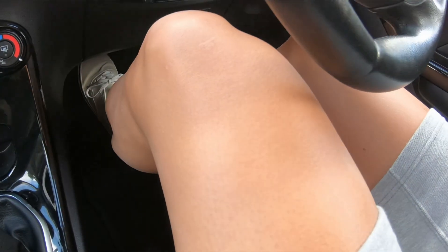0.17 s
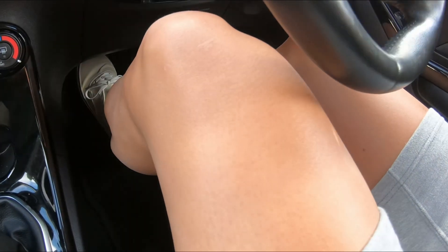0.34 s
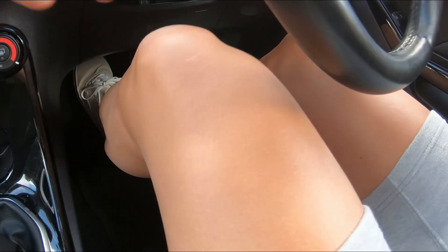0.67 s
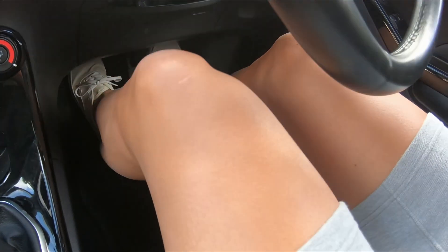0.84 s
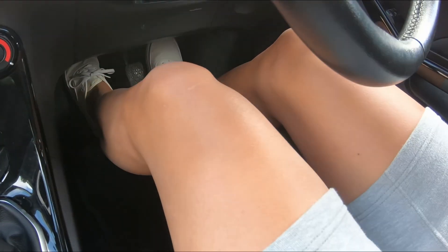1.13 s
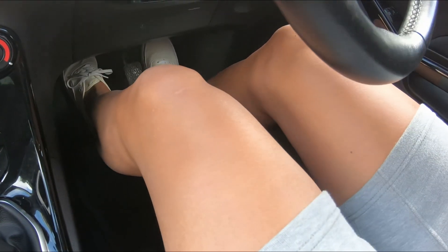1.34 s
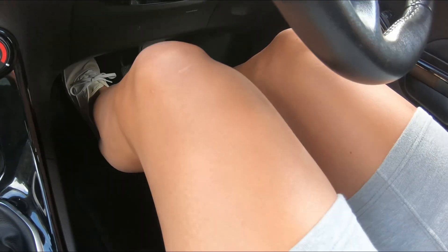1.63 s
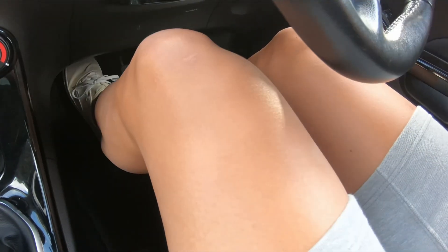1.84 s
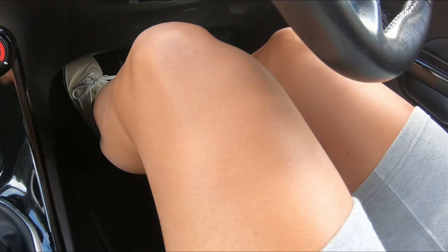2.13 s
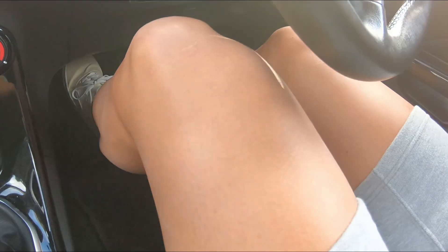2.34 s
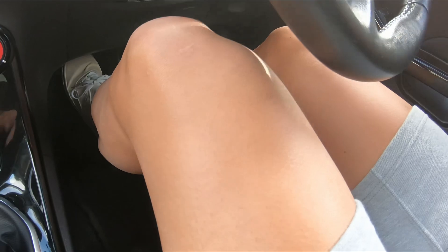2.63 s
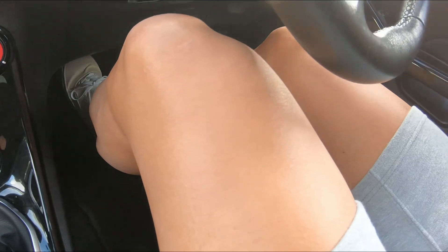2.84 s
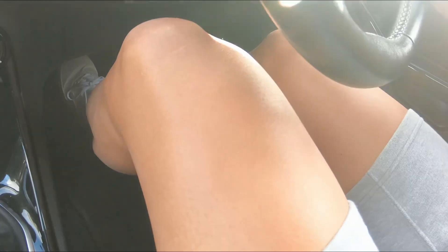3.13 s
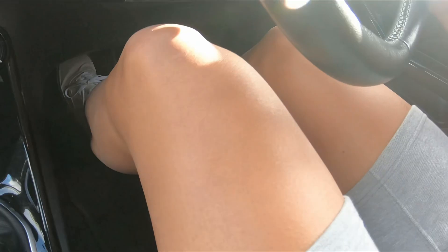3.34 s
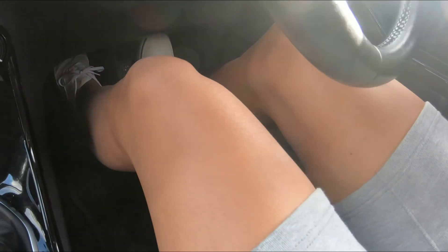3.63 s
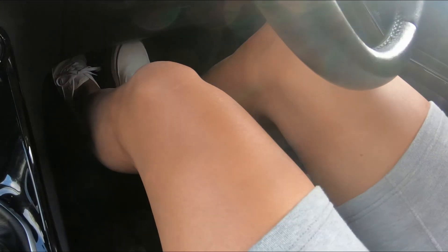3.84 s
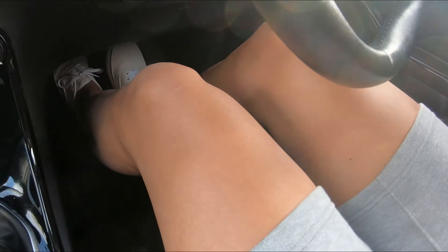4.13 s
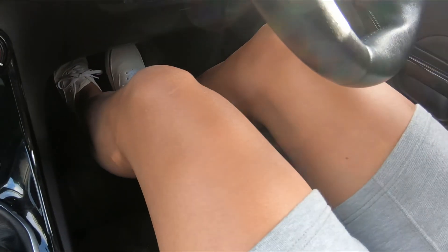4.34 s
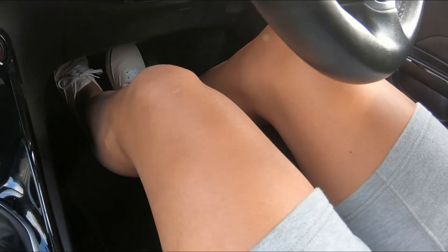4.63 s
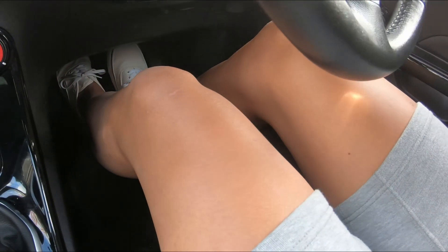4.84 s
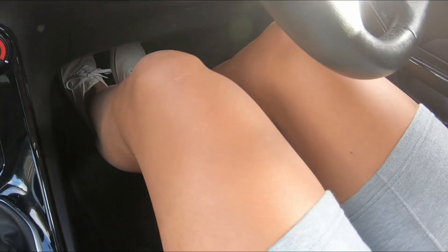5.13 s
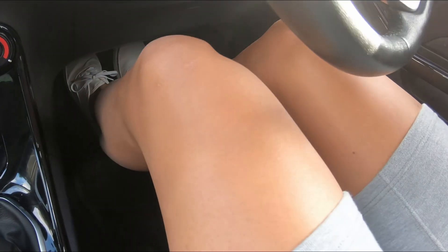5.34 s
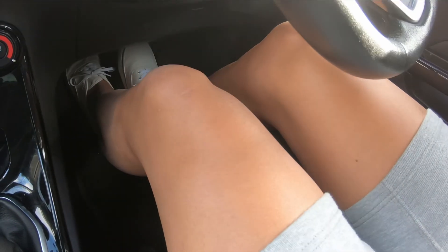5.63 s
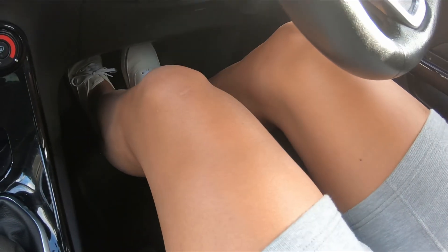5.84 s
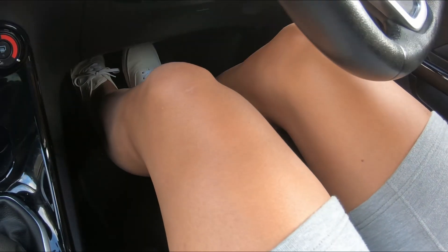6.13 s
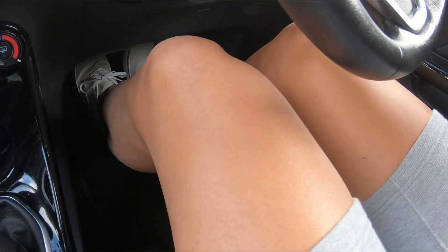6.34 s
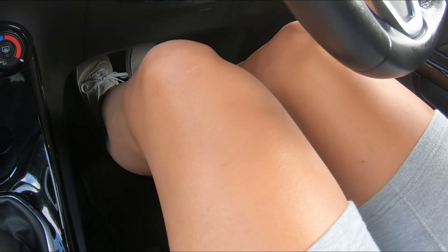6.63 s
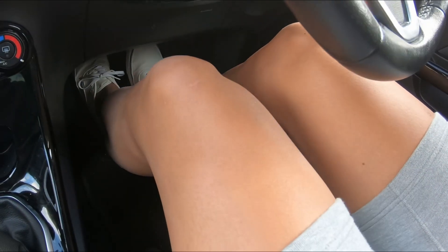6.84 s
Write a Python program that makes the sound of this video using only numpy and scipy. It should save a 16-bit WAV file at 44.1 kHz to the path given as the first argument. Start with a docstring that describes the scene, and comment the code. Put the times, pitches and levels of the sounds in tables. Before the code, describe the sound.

Close inside a small car, deep road boom, tyre hiss, a faint wavering fan tone and a gentle engine run throughout. Ten hollow indicator ticks start almost at once, alternating slightly in tone. Early on come trim clicks, a sleeve swish, dull bumps on the microphone and a sharp shoe knock on a pedal. After the ticking stops, a sole scuffs grittily and the floor thumps; the engine drops lower.

```python
"""Inside a small car rolling through a turn, over coloured noise of road and tyres and a wavering fan tone.
First the indicator begins its ten ticks (short wave groups with cabin echoes), and trim clicks (resonant noise bursts).
Clothes swish (grainy noise), the microphone is bumped (decaying modes) and the engine (gliding orders) pulls gently.
Next a shoe strikes a pedal (modes under a noise crack), and the stereo picture narrows, then opens again.
Late on the ticks end, the sole scuffs the pedal (slips of gritty noise), the floor drums and the engine falls back."""
import sys
import numpy as np
from scipy import signal
from scipy.fft import rfft, irfft, next_fast_len
from scipy.io import wavfile
from scipy.ndimage import uniform_filter1d

SR = 44100
rng = np.random.default_rng(int(sys.argv[2]) if len(sys.argv) > 2 else 0)


def pcm_store(signal):
    """Save signal as 16-bit PCM."""
    levels = np.round(np.clip(np.atleast_2d(signal), -1, 1) * 32767)
    wavfile.write(sys.argv[1], SR, levels.astype(np.int16).T)


N = 307818
TIME = np.arange(N) / SR

# Road roughness shaking the body. Each row: time in seconds, relative boom level in dB, rumble level in dB.
SURFACE = [(0, -30.5, -71), (.3, -29, -34), (.6, -33.5, -31.5), (.8, -30.5, -48.5), (1.05, -37.5, -36),
           (1.5, -46, -41.5), (1.8, -28, -40), (2.45, -38, -39), (3.4, -30.5, -33.5), (4.3, -28.5, -37),
           (4.7, -33.5, -36), (5.5, -26.5, -41), (6.05, -32.5, -44.5), (6.7, -29.5, -40.5),
           (6.98, -31, -42.5)]
# Dips in the road. Each row: time in seconds, boom level in dB, half length in seconds, swing in Hz.
JOLTS = [(0.474, -22, 0.032, 25.1), (0.674, -22, 0.033, 36.93), (1.756, -30.5, 0.035, 41),
         (2.787, -27.5, 0.022, 40.13), (3.96, -26, 0.029, 33.96), (4.105, -21.5, 0.043, 32.05),
         (4.417, -25, 0.058, 33.12), (4.9, -25, 0.035, 26.95), (5.26, -27, 0.034, 32.08),
         (5.41, -25.5, .035, 31.15), (5.661, -23, 0.026, 35), (6.698, -29, 0.049, 28)]
JOLT_RUMBLE_DB = -14   # rumble gain of a jolt's bell curve
# Rolling tyres. Each row: time in seconds, relative drone level in dB, relative hiss level in dB.
ROLLING = [(0, -63, -73), (.35, -51.5, -68.5), (.85, -54, -66), (1.1, -48, -65.5), (1.85, -51, -64),
           (2.3, -46.5, -63.5), (2.75, -49.5, -65.5), (3.9, -53.5, -67), (4.7, -56.5, -68.5),
           (5.25, -53.5, -64.5), (5.4, -54, -64), (5.58, -52, -64), (5.95, -55.5, -66.5),
           (6.98, -58.5, -71)]
# Noise spectra of road and tyres. Each row: frequency in Hz, relative density in dB per Hz.
BOOM_SPECTRUM = [(12, -37.5), (22, -7.5), (32, 5), (44, -2), (60, -12.5), (90, -34.5)]
RUMBLE_SPECTRUM = [(40, -16.5), (62, 2.5), (85, -0.5), (102, -4), (125, -4), (160, -15), (210, -23.5),
                   (300, -41)]
DRONE_SPECTRUM = [(130, -3), (230, 5), (300, 1), (360, -4), (440, -5), (540, -11.5), (750, -17.5),
                  (1000, -28.5), (1600, -46.5)]
HISS_SPECTRUM = [(350, -11), (600, 6.5), (850, 3.5), (1050, 1), (1300, 1.5), (1550, -5), (2200, -12.5),
                 (3200, -19.5), (5000, -23.5), (8000, -31.5), (11000, -57.5)]
TREAD_SPECTRUM = [(1050, -23.5), (1240, -1.5), (1330, -2), (1450, -8.5), (1650, -25)]
# Likeness of left and right, for the road and for close sources. Each row: frequency in Hz, likeness from -1 to 1.
ROAD_LIKENESS = [(30, 1), (60, 0.7), (150, 0.51), (200, 0.92), (290, 0.89), (450, 0.4), (750, 0.13),
                 (1000, -0.12), (1300, -0.49), (1800, 0.26), (2500, 0.43), (4000, 0.71), (7000, 0.024)]
NEAR_LIKENESS = [(200, 1), (550, 0.94), (850, .45), (1200, 0.67), (2200, 0.65), (4000, 0.86), (8000, 0.21)]

# Fan blade tone. Each row: time in seconds, level in dB, rms waver in Hz.
FAN_LEVEL = [(0, -47.5, 1), (.6, -46.5, 1.7), (1.0, -44.5, 1.85), (1.7, -46.5, 1.89), (2.8, -41.5, 1.17),
             (3.3, -48.5, 1.37), (4.3, -48, 1), (4.8, -46, 0.49), (6.98, -46, 0.34)]
# Brief sags of the fan's pitch. Each row: time in seconds, depth in Hz.
FAN_SAGS = [(.3, 4.52), (1.5, 2.07)]
FAN_HZ, FAN_SAG_HALF_S, FAN_FLUTTER_DB = 222.2, 0.1225, 0.96

# Engine. Each row: time in seconds, firing rate in Hz, pull in dB.
ENGINE = [(0, 29, -43), (.3, 23.5, -38), (.52, 25, -35), (.6, 37.3, -33), (.75, 40, -33.5),
          (.95, 43.3, -37.5), (1.25, 44.8, -37), (1.65, 40, -39), (2.0, 42, -40), (2.3, 46.3, -36.5),
          (2.6, 41.5, -39.5), (2.8, 37.5, -40), (3.1, 39, -39), (3.4, 39.8, -36.5), (3.6, 41.6, -35.5),
          (3.9, 42.5, -38), (4.15, 32, -42), (5.2, 29.5, -43), (5.7, 31, -44), (6.98, 30.5, -47)]
# Strength of the firing orders, first to eighth. Each entry: relative level in dB.
ORDER_DB = [0, 0.5, 0, -4, -1.5, -1, -1.5, 0]
# Passage of the engine's orders into the cabin. Each row: frequency in Hz, gain in dB.
CABIN_GAIN = [(20, 10), (31, 7.5), (43, 3.5), (60, -1), (77, 0), (90, -1), (102, -10.5), (113, -2),
              (126, -1.5), (132, -10.5), (175, -13), (215, -18), (268, -17), (330, -25), (450, -20)]

# Sharp clicks: plastic trim, and at 0.57 s the bumped microphone casing. Each row: time in seconds, level in
# dB, t60 in seconds, ring in Hz.
CLICKS = [(0.238, -49.5, 0.053, 3360), (.4795, -49, 0.021, 2200), (.570, -46, 0.022, 1890),
          (.638, -54, 0.057, 2490), (0.6903, -51, 0.025, 2680), (1.074, -59.5, 0.089, 3230),
          (1.179, -54, 0.09, 3270), (1.657, -60, 0.11, 3280), (3.865, -54, 0.048, 3300),
          (3.895, -59, 0.088, 2380), (4.34, -57, 0.17, 1520), (4.83, -62.5, 0.066, 3300),
          (4.843, -61.5, 0.083, 3300), (5.541, -66, 0.046, 3740), (5.627, -61, 0.033, 5500),
          (6.485, -62, 0.095, 3200), (6.51, -66, 0.068, 4000), (6.559, -54, 0.065, 5900)]
CLICK_RISE_S = .0018
# Noise spectrum of the clicks. Each row: frequency in Hz, relative density in dB per Hz.
TRIM_SPECTRUM = [(800, -3), (2200, 3), (3600, -4.5), (5000, -8.5), (7200, -7), (9000, -19.5), (13000, -41)]

# Steady airy hiss of cloth. Each row: time in seconds, level in dB.
AIRY_BED = [(0, -75), (1.4, -72.5), (2.2, -84.5), (3.4, -87), (4.2, -76.5), (4.6, -84.5), (5.4, -77.5),
            (5.95, -81.5), (6.98, -83)]
# Hands sliding on the wheel and clothes. Each row: time in seconds, level in dB, half length in seconds.
STROKES = [(0, -70.5, 0.026), (0.635, -66, 0.062), (1.174, -61.5, 0.014), (1.319, -61.5, 0.019),
           (1.779, -64.5, 0.029), (1.97, -72.5, 0.023), (2.054, -75, 0.041), (3.17, -71.5, 0.061),
           (3.369, -68, 0.027), (3.534, -68.5, 0.08), (3.71, -54.5, 0.024), (3.853, -65, 0.039),
           (3.938, -53, 0.0056), (4.41, -72.5, 0.091), (5.55, -76, .025), (6.1, -74, 0.043)]
# Sleeve swishes. Each row: time in seconds, level in dB, rise in seconds, t60 in seconds.
SWISHES = [(.447, -57, 0.0092, 0.39), (.475, -45.5, 0.012, 0.3), (.553, -47, 0.0029, 0.029),
           (.84, -46.5, 0.03, .04), (3.708, -65, 0.0063, 0.088)]
# Noise spectra of cloth, swish and squeak. Each row: frequency in Hz, relative density in dB per Hz.
CLOTH_SPECTRUM = [(700, -15), (1600, 4.5), (3000, 4), (4200, -0.5), (5200, 0.5), (7000, -1.5), (8500, -9.5),
                  (10500, -16.5), (12000, -26.5), (15000, -35.5)]
SWISH_SPECTRUM = [(900, -23), (1750, 4.5), (2400, -7.5), (3400, -1), (5000, -9), (7000, -1), (8800, -11.5),
                  (10500, -10.5), (11800, -28), (15000, -24)]
SQUEAK_SPECTRUM = [(1550, -23), (1720, -1), (1900, -35)]

# Shoe striking a pedal and bouncing. Each row: time in seconds, relative level in dB, rise and t60 in seconds.
STRIKES = [(0.861, -37, 0.0038, .04), (0.8655, -25, 0.0012, 0.052), (0.8703, -29, 0.0008, 0.039),
           (0.875, -37.5, 0.0012, 0.083)]
# Sole slipping over the pedal. Each row: time in seconds, relative level in dB, t60 in seconds, ring in Hz.
SLIPS = [(3.944, -27, 0.13, 1900), (3.951, -35, 0.044, 1090), (3.958, -29.5, 0.057, 2335),
         (3.9648, -31, 0.052, 1200), (3.9764, -31, 0.045, 1100), (3.981, -34, 0.03, 3520),
         (3.9868, -32, 0.058, 6000), (4.004, -33.5, 0.037, 2180), (4.010, -39, 0.059, 1150),
         (4.021, -45, 0.18, 3030), (4.0473, -49, 0.026, 3200)]
SLIP_RISE_S = .002
# Modes of the pedal. Each row: frequency in Hz, relative dB when struck, relative dB when scuffed, t60 in seconds.
PEDAL_MODES = [(715, -39, -47, .05), (1023, -46, -34, .07), (1256, -26, -30, 0.064), (1385, -32, -41, .08),
               (1587, -31.5, -40, 0.068), (1800, -44, -34.5, .07), (1880, -36, -38, .06),
               (2160, -49, -35, 0.049), (2950, -38, -37.5, 0.077), (3210, -39.5, -35.5, 0.062),
               (3500, -48, -44, .06), (3755, -42, -45.5, .05), (4490, -37, -37, 0.061),
               (4680, -39, -42, 0.046), (5200, -34, -48, .04), (5545, -35, -48, .035),
               (5900, -44.5, -38, 0.061)]
# Noise spectra of strike and rubbing sole. Each row: frequency in Hz, relative density in dB per Hz.
STRIKE_SPECTRUM = [(400, -7), (750, -2), (1000, -4), (1280, 8), (1700, 2), (2350, -6), (3000, -5),
                   (5500, -3), (7000, -6.5), (10000, -21), (11500, -27.5), (15000, -33)]
SOLE_SPECTRUM = [(130, 13.5), (210, 5.5), (370, 1), (520, 5), (800, 0.5), (1150, 4), (1480, -1),
                 (1750, 2.5), (2200, -1), (3500, -4), (6000, -6.5), (8000, -10.5), (10200, -17.5),
                 (11300, -29), (15000, -35.5)]
# Modes of the footwell floor. Each row: frequency in Hz, level in dB, t60 in seconds.
FOOTWELL_MODES = [(212.5, -28, 0.28), (155, -33, 0.42), (304.4, -41, .2)]
FOOTWELL_RISE_S = 0.024

# Bumps against the microphone's casing. Each row: time in seconds, relative thud level in dB, rattle level in dB.
BUMPS = [(0.5355, -5, -27), (.582, -1.5, -31.5), (0.6255, -14, -40), (.667, -11.5, -35)]
# Modes of the casing. Each row: frequency in Hz, relative level in dB, t60 in seconds.
CASING_MODES = [(118, -24.5, 0.19), (210.6, -17, 0.12), (327, -16.5, 0.014), (470, -17, 0.035),
                (850, -20.5, 0.012), (1310, -34, 0.058)]
# Noise spectrum of the rattle. Each row: frequency in Hz, relative density in dB per Hz.
RATTLE_SPECTRUM = [(100, 15), (330, 16.5), (600, 2), (900, -2), (1250, -13), (1900, -6), (2350, -23),
                   (3400, -21), (3900, -8), (4500, -34), (9000, -49)]

# Indicator strokes. Each row: time in seconds, relative level in dB, added sharpness in dB, pitch in Hz.
TICKS = [(0.1771, -8, 6, 760), (0.5306, -5.5, 9, 688), (0.9745, -6.5, 7, 717), (1.3325, -2.5, 5.5, 690),
         (1.7533, -3, 3.5, 725), (2.129, -1, 0.5, 684), (2.529, -3, 1.5, 733), (2.9034, -3.5, 1, 690),
         (3.333, -5.5, 4, 732), (3.6866, -6, 4.5, 696)]
# Cabin reflections of the strokes. Each row: delay in seconds, left gain in dB, right gain in dB.
ECHOES = [(.0059, -2.5, -10.5), (.0086, -28.5, -35.5), (.0175, -14.5, -19.5), (.0245, -30, -27.5)]
# Upper ring of the on and off strokes. Each row: frequency in Hz, relative density in dB per Hz.
ON_SPECTRUM = [(600, 8.5), (1020, 18), (1230, -1), (1650, 4.5), (2030, -4), (2570, 2.5), (2950, -8.5),
               (3500, -15), (3980, -2.5), (4500, -22), (6000, -20.5), (9000, -42)]
OFF_SPECTRUM = [(450, 5), (1000, 12), (1300, -2), (1700, 7.5), (1950, 2), (2250, 4), (2900, 0.5),
                (3600, 1.5), (4400, -12), (6000, -21), (9000, -34.5)]
# Modes of the indicator's small case, on and off strokes. Each row: frequency in Hz, relative dB, t60 in seconds.
ON_MODES = [(1560, -45.5, 0.033), (2536, -46, 0.036), (2760, -52.5, 0.058), (3950, -51.5, 0.028)]
OFF_MODES = [(1294, -46, 0.045), (2250, -47.5, 0.042), (3560, -56, 0.071)]
RING_RISE_S = 0.0015   # rise of modes kept ringing by blows, here and in the pedal

# Width of the stereo picture. Each row: time in seconds, gain of the side signal in dB.
SPREAD = [(0, 3.5), (.7, 3.5), (1.45, -38.5), (2.25, -68.5), (2.4, -18), (2.9, -5), (4.2, 0.5), (6.98, 2)]
STOPBAND_HZ = 16000


def from_db(db):
    """Amplitude ratio: 20 dB is a factor of ten."""
    return 10 ** (np.asarray(db) / 20)


def rms_one(x):
    """Normalization: divide by the root of the mean power."""
    return x / np.sqrt(np.mean(x ** 2) + 1e-20)


def in_time(rows):
    """Linear interpolation: each column becomes a curve over the samples."""
    s, *columns = np.transpose(rows)
    return [np.interp(TIME, s, c) for c in columns]


def at_hz(points, hz):
    """Logarithmic pitch: interpolate a table over log frequency."""
    knots, values = np.transpose(points)
    return np.interp(np.log(hz + 1e-3), np.log(knots), values)


def pan(left_db):
    """Level difference between the sides, shared equally in dB."""
    return from_db(np.array([[.5], [-.5]]) * left_db)


def drift(rate):
    """Low-passed randomness: white noise weakened above a rate in Hz, with rms 1."""
    size = next_fast_len(N, True)
    hz = np.fft.rfftfreq(size, 1 / SR)
    slowed = rfft(rng.standard_normal(size)) / (1 + (hz / rate) ** 2)
    return rms_one(irfft(slowed, size)[:N])


def noise(spectrum, likeness, grain=1):
    """Spectral shaping and coherence: coloured stereo noise of rms 1, mixed from mid and side by likeness."""
    size = next_fast_len(N, True)
    hz = np.fft.rfftfreq(size, 1 / SR)
    low_end = np.minimum(hz / spectrum[0][0], 1) ** 2
    high_end = np.maximum(hz / spectrum[-1][0], 1) ** 4
    colour = from_db(at_hz(spectrum, hz)) * low_end / high_end
    alike = np.clip(at_hz(likeness, hz), -1, 1)
    white = rng.standard_normal((2, size))
    white[:, :N] *= grain
    mid, side = rfft(white) * colour
    left_right = np.sqrt(1 + alike) * mid + np.sqrt(1 - alike) * side * [[1], [-1]]
    return rms_one(irfft(left_right, size)[:, :N])


def evened(x, span_s):
    """Short-time power: dividing by its root steadies the loudness of a low noise."""
    power = uniform_filter1d(np.mean(x ** 2, axis=0), int(span_s * SR))
    return x / np.sqrt(uniform_filter1d(power, int(span_s * SR / 2)) + 1e-9)


def envelope(rows):
    """Exponential decay: contacts rise fast, fall 60 dB per t60 in the padded cabin, and add in power."""
    power = np.zeros(N)
    for s, level_db, rise, t60 in rows:
        span = slice(max(int(s * SR), 0), int(s * SR) + SR // 2)
        age = TIME[span] - s
        fall_db = -60 * np.maximum(age - rise, 0) / t60
        power[span] += (np.clip(age / rise, 0, 1) * from_db(level_db + fall_db)) ** 2
    return np.sqrt(power)


def swells(rows):
    """Gaussian growth and decay: bell curves given by time, level and half length (standard deviation)."""
    return sum(from_db(db) * np.exp(-((TIME - s) / half) ** 2 / 2) for s, db, half in rows)


def resonance(x, hz, t60):
    """Damped resonance: a pole pair with gain 1 at its peak."""
    r = from_db(-60 / (t60 * SR))
    feedback = [1, -2 * r * np.cos(2 * np.pi * hz / SR), r * r]
    return signal.lfilter((1 - r * r) / 2 * np.array([1, 0, -1]), feedback, x + 1e-18)


def ringing(blows, modes, vary_db, port_lag=0.66):
    """Modal excitation: blows (s, dB) feed modes in random shares; the sides differ in phase (spread in radians)."""
    s, db = np.transpose(blows)[:, :, None]
    span = slice(int(s.min() * SR), int(s.max() * SR) + SR // 5)
    age = np.maximum(TIME[span] - s, 0)
    out = np.zeros((2, N))
    for hz, mode_db, t60 in modes:
        fall_db = -60 * age / t60
        share_db = vary_db * rng.standard_normal(s.shape)
        each = np.minimum(age / RING_RISE_S, 1) * from_db(db + mode_db + fall_db + share_db)
        phase = 2 * np.pi * (hz * TIME[span] + rng.random()) + port_lag * rng.standard_normal((2, 1))
        out[:, span] += np.sqrt(np.sum(each ** 2, axis=0)) * np.sin(phase)
    return out


def catches(per_s, share, grain_s):
    """Stick and slip: random catches snap and die at once, carrying a share of the power of a rub."""
    snaps = (rng.random(N) < per_s / SR) * rng.uniform(.2, 1, N)
    power = signal.lfilter([1], [1, -np.exp(-1 / (grain_s * SR))], snaps + 1e-18)
    share = np.clip(share, 0, 1)
    return np.sqrt(1 - share + share * power / power.mean())


def contacts(rows, source, rise_s, ring_db, cycles, low_share):
    """Local resonance: each noise burst stresses the pitch of the touched spot and is thin well below it."""
    out = np.zeros((2, N))
    for s, db, t60, hz in rows:
        span = slice(int(s * SR), int(s * SR) + SR // 2)
        high_pass = signal.butter(2, low_share * hz, "high", fs=SR, output="sos")
        thin = signal.sosfilt(high_pass, source[:, span])
        burst = rms_one(thin + from_db(ring_db) * resonance(thin, hz, cycles / hz))
        out[:, span] += envelope([(s, db, rise_s, t60)])[span] * burst
    return out


def road(boom_even_s=0.075, rumble_even_s=0.067, tread_db=-6.0, tread_flutter_db=4.5):
    """Forced vibration: roughness shakes the body, jolts set it swinging, and tyres drone, hiss and sing."""
    boom_db, rumble_db = in_time(SURFACE)
    drone_db, hiss_db = in_time(ROLLING)
    swing = np.zeros(N)
    for s, db, half, hz in JOLTS:
        swing += swells([(s, db, half)]) * np.sqrt(2) * np.sin(2 * np.pi * (hz * TIME + rng.random()))
    boom = from_db(boom_db + 1.0) * evened(noise(BOOM_SPECTRUM, ROAD_LIKENESS), boom_even_s)
    shaking = (boom + swing) * pan(left_db=-5.5)
    jolts = swells([row[:3] for row in JOLTS])
    rumble_gain = np.hypot(from_db(rumble_db), from_db(JOLT_RUMBLE_DB) * jolts)
    rumble = rumble_gain * evened(noise(RUMBLE_SPECTRUM, ROAD_LIKENESS), rumble_even_s) * pan(left_db=0.5)
    drone = from_db(drone_db + 4.0 + 1.0 * drift(19.0)) * noise(DRONE_SPECTRUM, ROAD_LIKENESS)
    hiss = from_db(hiss_db + 5.0 + 1.1 * drift(14)) * noise(HISS_SPECTRUM, ROAD_LIKENESS)
    tread_gain = from_db(hiss_db + tread_db + tread_flutter_db * drift(12))
    tread = tread_gain * noise(TREAD_SPECTRUM, ROAD_LIKENESS)
    return shaking + rumble + drone + hiss + tread


def fan(lead=1.22):
    """Frequency modulation: one blade tone wavers and sags, stronger on the left and ahead there by lead radians."""
    level_db, waver_hz = in_time(FAN_LEVEL)
    sag_hz = sum(depth * np.exp(-((TIME - s) / FAN_SAG_HALF_S) ** 2 / 2) for s, depth in FAN_SAGS)
    phase = 2 * np.pi * np.cumsum(FAN_HZ - sag_hz + waver_hz * drift(5.76)) / SR
    tone = np.sqrt(2) * np.sin(phase + np.array([[lead], [0]]))
    return from_db(level_db + FAN_FLUTTER_DB * drift(5.8)) * tone * pan(left_db=4.0)


def engine(wander=0.0037, surge_db=2.5):
    """Harmonic series: firing orders glide through the cabin's booms, each surging on its own."""
    firing_hz, pull_db = in_time(ENGINE)
    phase = 2 * np.pi * np.cumsum(firing_hz * (1 + wander * drift(9.4))) / SR
    orders = np.zeros(N)
    for k, order_db in enumerate(ORDER_DB, 1):
        gain = from_db(order_db + at_hz(CABIN_GAIN, k * firing_hz) + surge_db * drift(4))
        orders += gain * np.sin(k * phase + rng.uniform(0, 2 * np.pi))
    return from_db(pull_db) * orders * pan(left_db=-1.0)


def trim():
    """Impulsive release: plastic parts click as the body flexes, and the bumped casing clicks once, each at its
    own pitch."""
    source = noise(TRIM_SPECTRUM, NEAR_LIKENESS)
    return contacts(CLICKS, source, CLICK_RISE_S, ring_db=2.5, cycles=9.1, low_share=0.62)


def clothes(grain_db=1.5, squeak_db=-14.0):
    """Friction noise: fibres and skin catch and let go, as grainy hiss over a faint airy bed."""
    air_db, = in_time(AIRY_BED)
    strokes = swells(STROKES) * from_db(grain_db * drift(150))
    brush = np.hypot(from_db(air_db), strokes) * noise(CLOTH_SPECTRUM, ROAD_LIKENESS)
    fibres = catches(per_s=500, share=.45, grain_s=.0007)
    rustle = noise(SWISH_SPECTRUM, NEAR_LIKENESS, fibres)
    squeak = from_db(squeak_db) * noise(SQUEAK_SPECTRUM, NEAR_LIKENESS)
    swish = envelope(SWISHES) * (rustle + squeak)
    return (brush + swish) * pan(left_db=-0.5)


def footwell():
    """Panel resonance: the floor drums when the sole lands on it."""
    landing_s = SLIPS[0][0]
    drumming = np.zeros(N)
    for hz, db, t60 in FOOTWELL_MODES:
        swell = envelope([(landing_s, db, FOOTWELL_RISE_S, t60)])
        drumming += swell * np.sin(2 * np.pi * (hz * TIME + rng.random()))
    return drumming * pan(left_db=3.5)


def pedal(crack_db=-0.5, rub_db=0.5, struck_db=23.5, scuffed_db=23.0):
    """Modes share frequencies but not strengths: a strike and a sticking, slipping sole ring one pedal differently."""
    crack = from_db(crack_db) * envelope(STRIKES) * noise(STRIKE_SPECTRUM, NEAR_LIKENESS)
    strike_blows = [(s, db + struck_db) for s, db, *_ in STRIKES]
    struck_modes = [(hz, db, t60) for hz, db, _, t60 in PEDAL_MODES]
    struck = ringing(strike_blows, struck_modes, vary_db=2.0)
    grit = catches(per_s=700, share=.7, grain_s=.0005)
    sole = noise(SOLE_SPECTRUM, NEAR_LIKENESS, grit)
    slips = contacts(SLIPS, sole, SLIP_RISE_S, ring_db=2.0, cycles=11.0, low_share=0.028)
    rub = from_db(rub_db) * slips
    slip_blows = [(s, db + scuffed_db) for s, db, *_ in SLIPS]
    scuffed_modes = [(hz, db, t60) for hz, _, db, t60 in PEDAL_MODES]
    scuffed = ringing(slip_blows, scuffed_modes, vary_db=4.5)
    return (crack + struck + rub + scuffed) * pan(left_db=1.1)


def handling(left_db=6.5, rattle_t60=0.033, soft_hz=1100):
    """Opposed pressure: a bump rocks the casing, giving a thud of opposite sign on the two sides and a dull rattle."""
    thud = np.zeros(N)
    for s, level_db, _ in BUMPS:
        span = slice(int(s * SR) + 1, int(s * SR) + SR // 2)
        age = TIME[span] - s
        for hz, mode_db, t60 in CASING_MODES:
            fall_db = -60 * age / t60
            thud[span] += from_db(level_db + mode_db + fall_db) * np.sin(2 * np.pi * hz * age)
    soft = signal.sosfilt(signal.butter(2, soft_hz, fs=SR, output="sos"), thud)
    shakes = envelope([(s - .002, db, .002, rattle_t60) for s, _, db in BUMPS])
    rattle = shakes * noise(RATTLE_SPECTRUM, NEAR_LIKENESS)
    return soft * [[-1], [1]] * pan(left_db) + rattle


def indicator(swell_s=0.0022, tock_db=-16.0, on_edge_db=-40.0, off_edge_db=-45.0, edge_rise=0.0025,
              edge_t60=0.097, side_lag_s=0.00017, hollow_hz=680, hollow_t60=0.029, hollow_db=-21.5):
    """Impact and reflection: a hollow tock of a few cycles, echoed by the cabin, with alternating upper rings."""
    tock = np.zeros(N)
    for s, level_db, _, pitch_hz in TICKS:
        age = TIME - s + swell_s / 2
        span = (age > 0) & (age < swell_s * 10)
        swell = age[span] / swell_s
        shape = (swell * np.exp(1 - swell)) ** 3   # peaks at 1 after swell_s
        cycles = np.cos(2 * np.pi * pitch_hz * (age[span] - swell_s))
        tock[span] += from_db(tock_db + level_db) * shape * cycles
    echoes = np.zeros((2, N))
    for delay, left, right in ECHOES:
        echoes += from_db([[left], [right]]) * np.interp(TIME - delay, TIME, tock)
    edges = [(s - swell_s / 2, db + sharp_db, edge_rise, edge_t60) for s, db, sharp_db, _ in TICKS]
    on = from_db(on_edge_db) * envelope(edges[::2]) * noise(ON_SPECTRUM, NEAR_LIKENESS)
    off = from_db(off_edge_db) * envelope(edges[1::2]) * noise(OFF_SPECTRUM, NEAR_LIKENESS)
    case = np.zeros((2, N))
    for k, (s, db, sharp_db, _) in enumerate(TICKS):
        case += ringing([(s, db + sharp_db)], OFF_MODES if k % 2 else ON_MODES, vary_db=3.0)
    lead = np.array([[.5], [-.5]]) * side_lag_s   # the dashboard is nearer the left port
    direct = np.interp(TIME + lead, TIME, tock)
    hollow = from_db(hollow_db) * resonance(tock, hollow_hz, hollow_t60)   # the dashboard rings on
    return direct + echoes + hollow + case + on + off


def spread(x):
    """Mid and side: scaling the difference narrows the picture to the centre for a while and opens it again."""
    side_db, = in_time(SPREAD)
    mid = x.mean(axis=0)
    return mid + (x - mid) * from_db(side_db)


def scene():
    """Superposition: all sources add as heard from the driver's lap, before the stereo width is set."""
    background = road() + fan() + engine()
    movements = trim() + clothes() + footwell() + pedal() + handling()
    return spread(background + movements + indicator())


def record(dry):
    """Band limiting: a steep low-pass holds everything above its stopband edge at least 70 dB down."""
    return signal.sosfilt(signal.cheby2(14, 70, STOPBAND_HZ, fs=SR, output="sos"), dry)


dry = scene()
out = record(dry)
pcm_store(out)
```